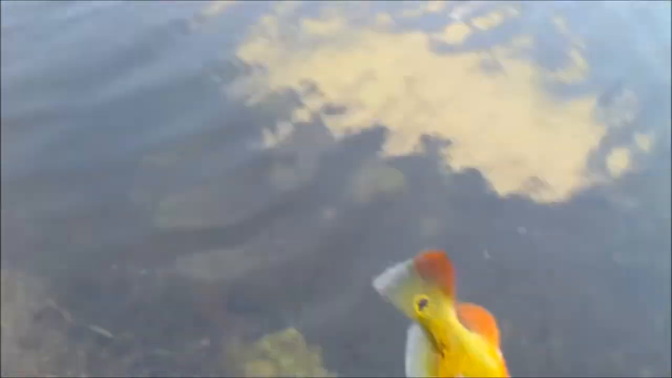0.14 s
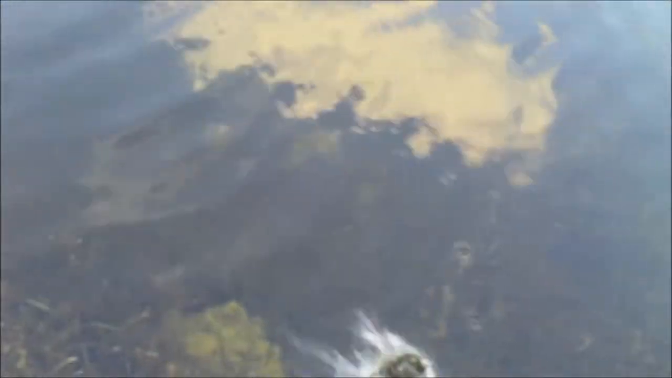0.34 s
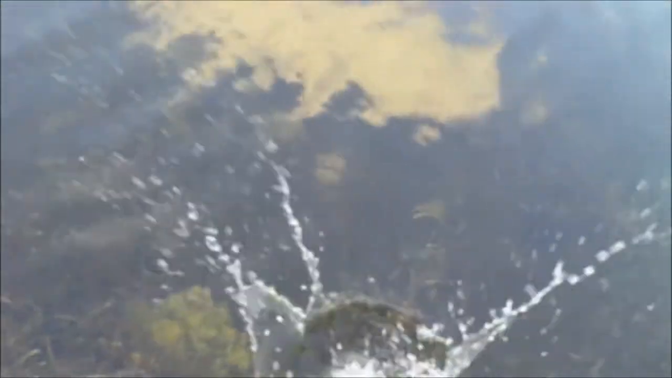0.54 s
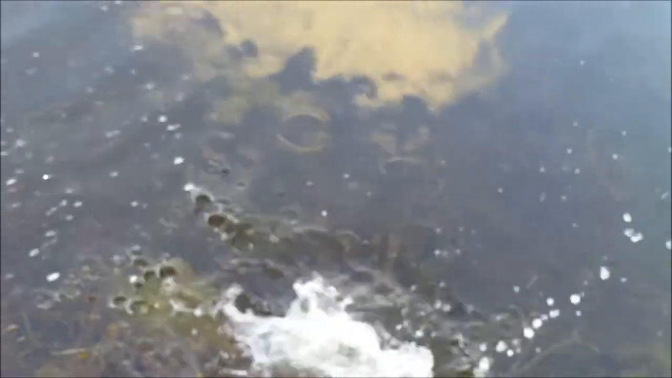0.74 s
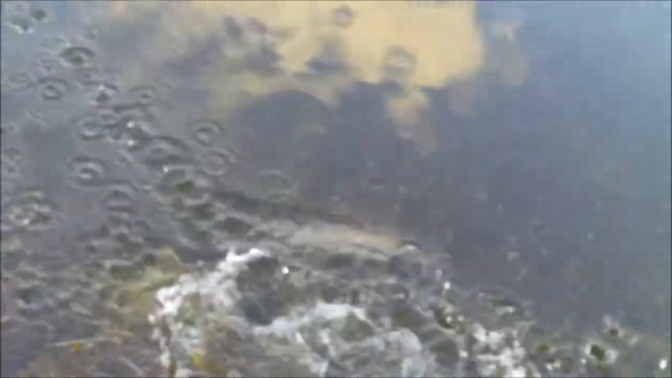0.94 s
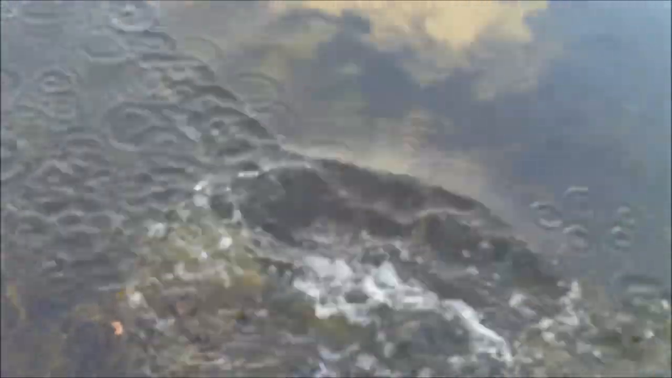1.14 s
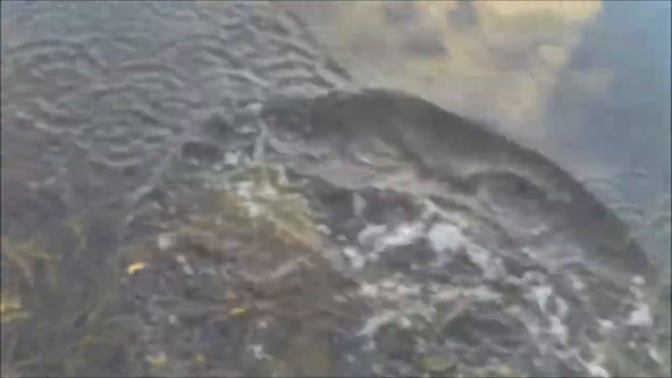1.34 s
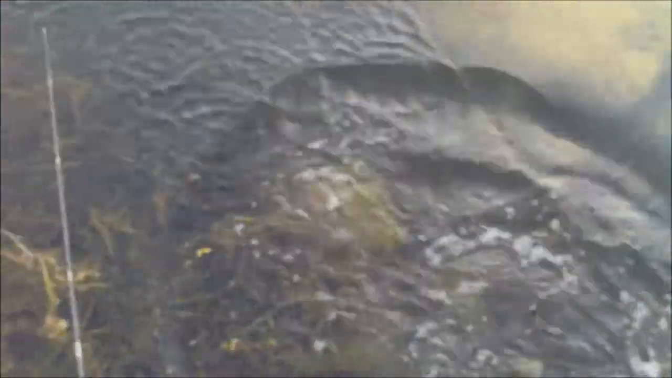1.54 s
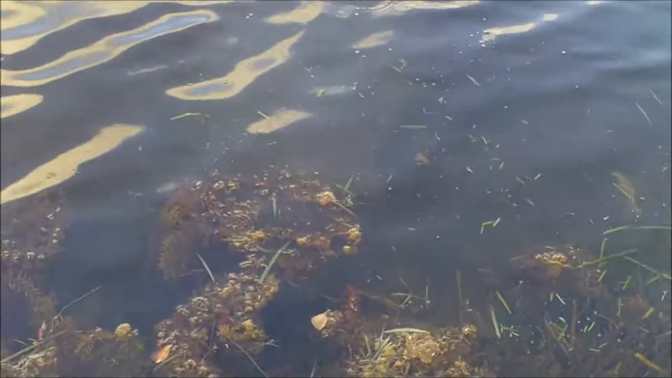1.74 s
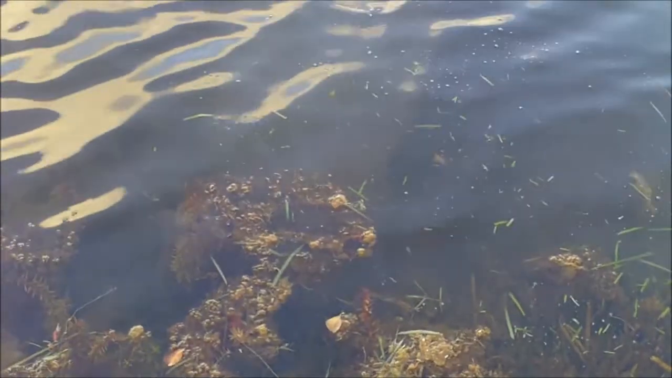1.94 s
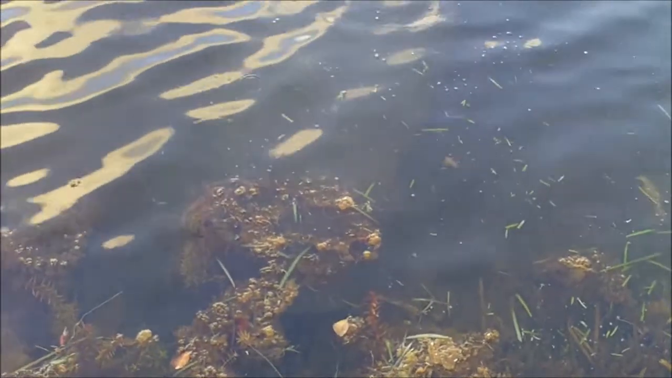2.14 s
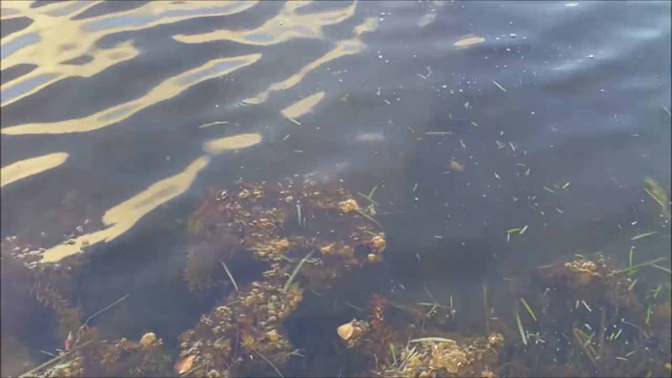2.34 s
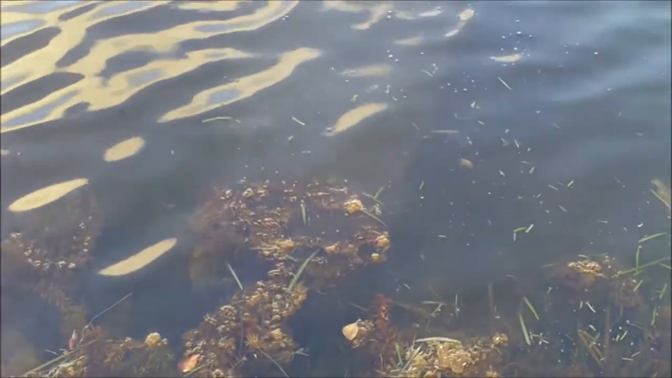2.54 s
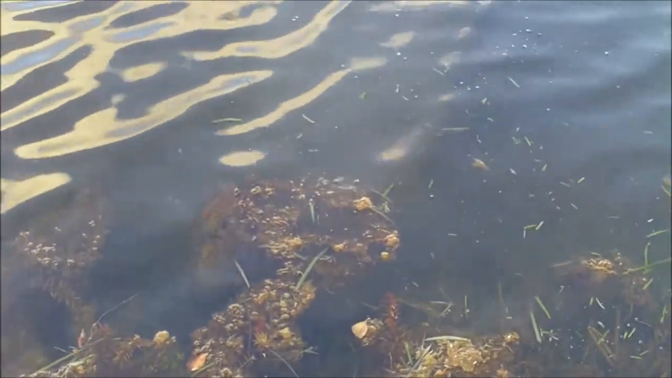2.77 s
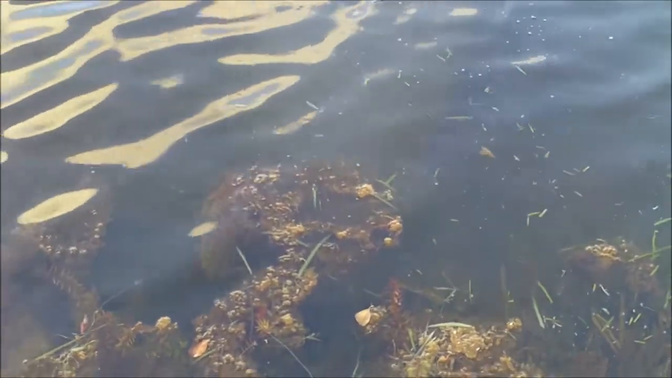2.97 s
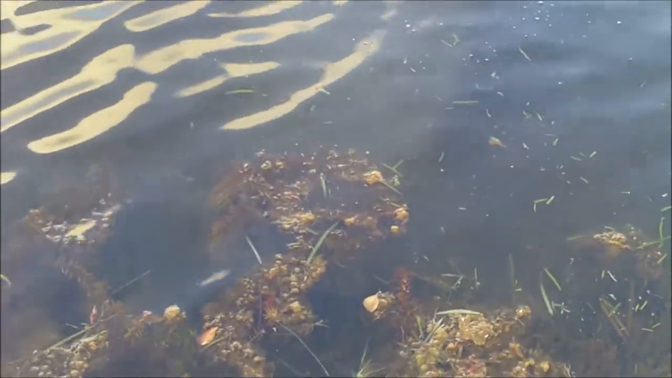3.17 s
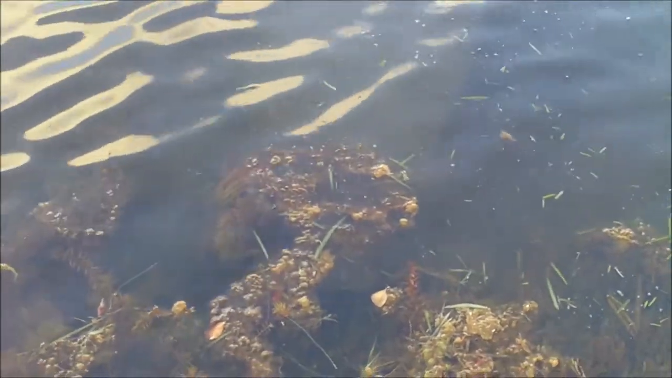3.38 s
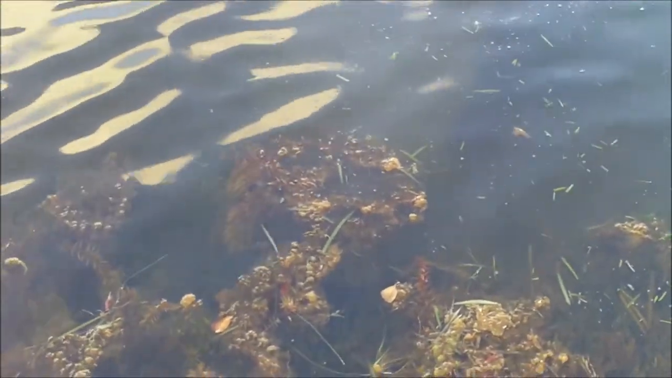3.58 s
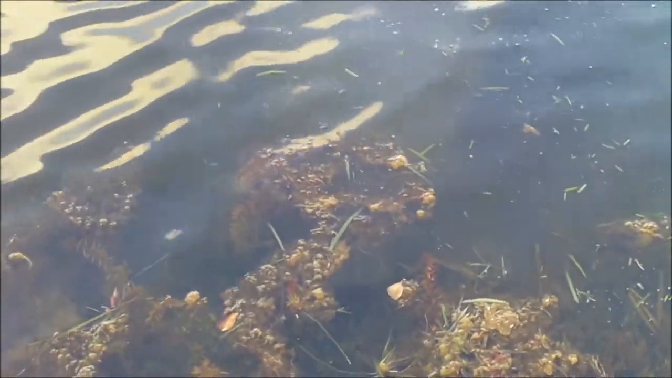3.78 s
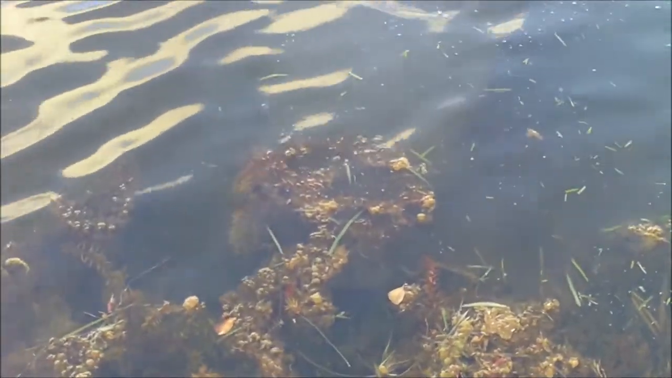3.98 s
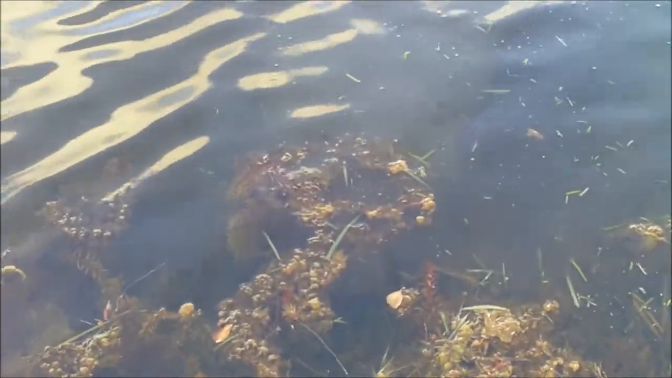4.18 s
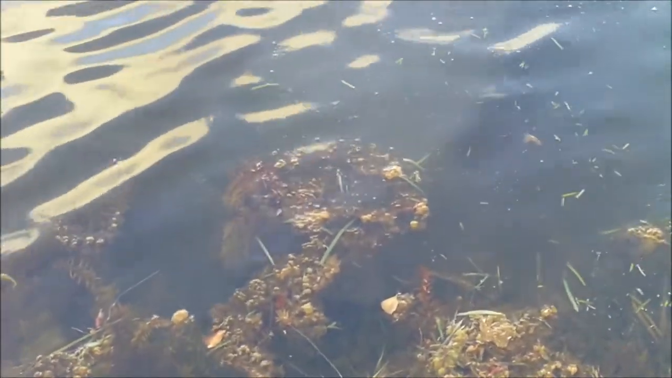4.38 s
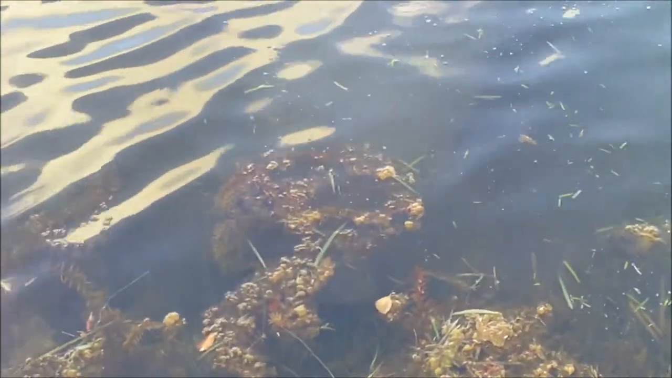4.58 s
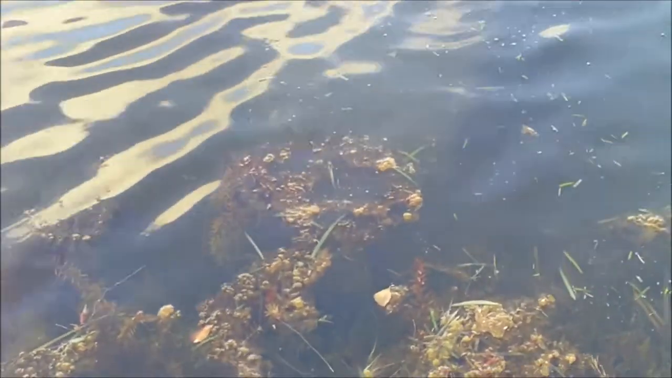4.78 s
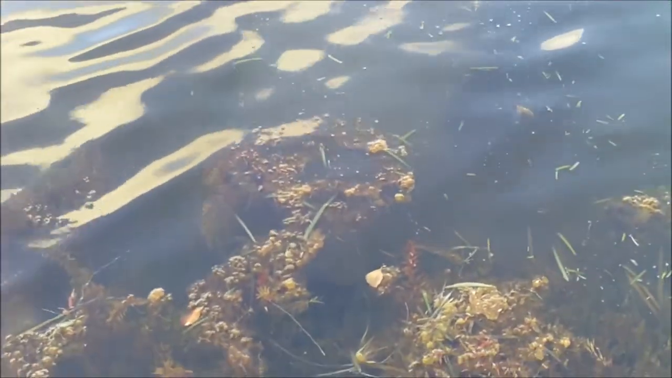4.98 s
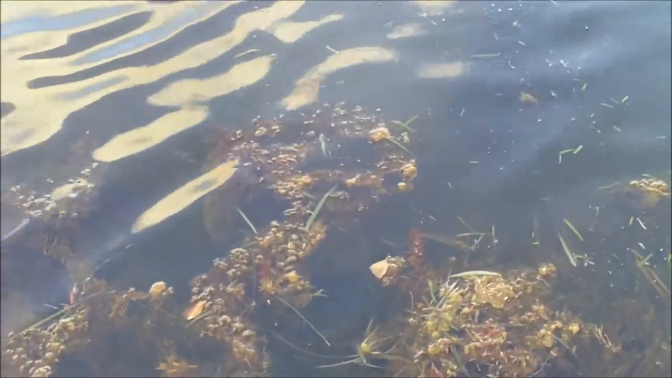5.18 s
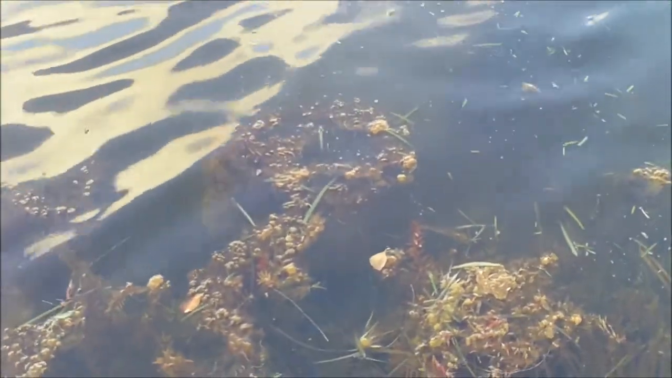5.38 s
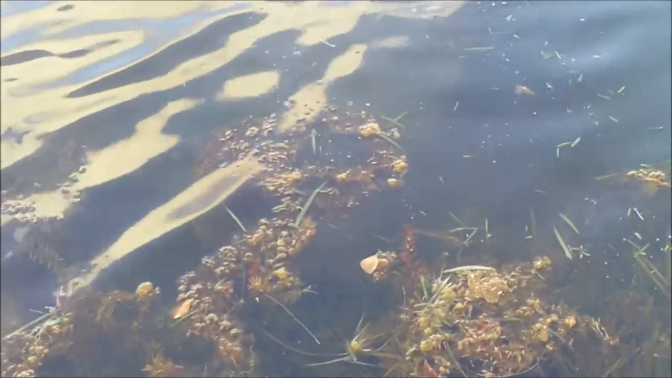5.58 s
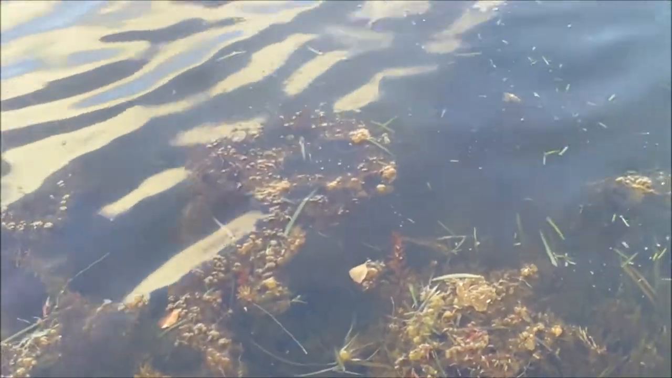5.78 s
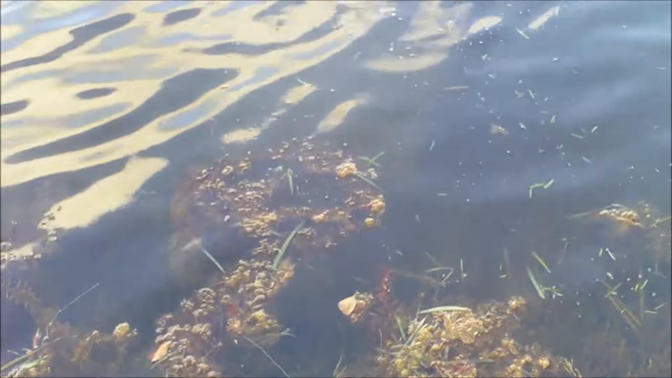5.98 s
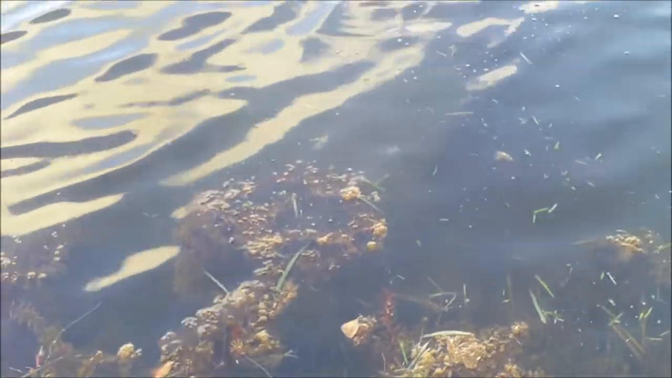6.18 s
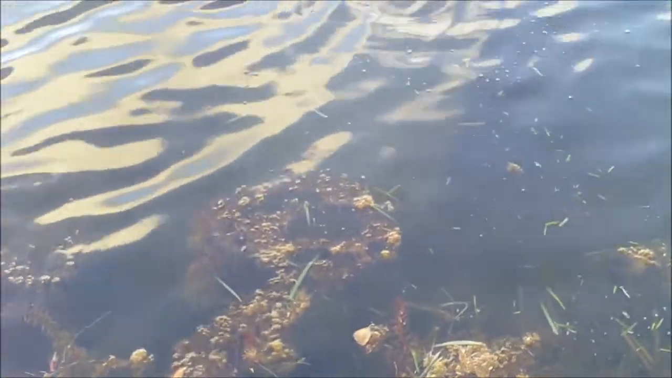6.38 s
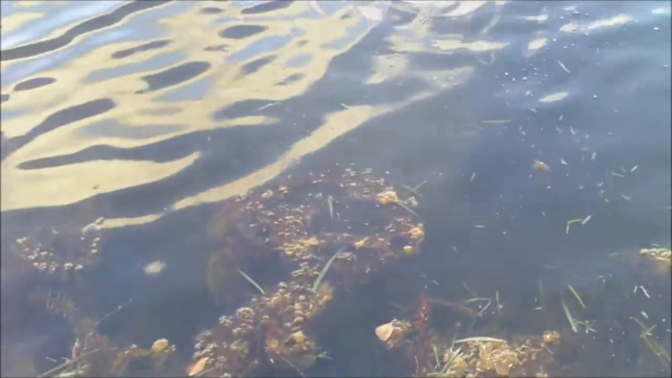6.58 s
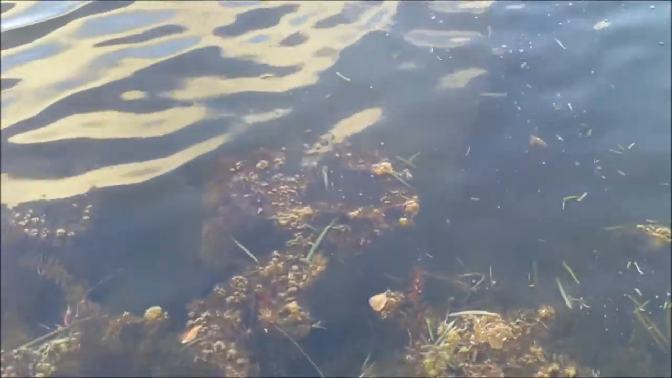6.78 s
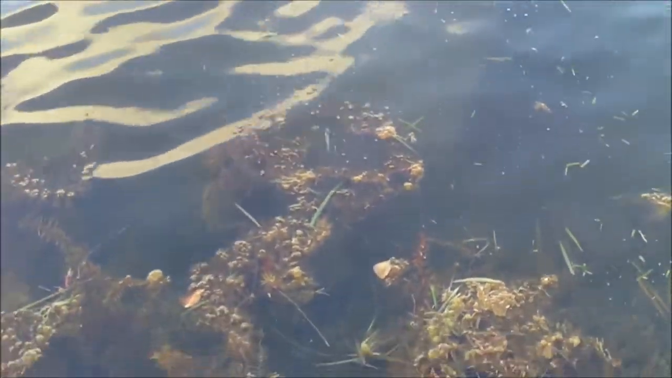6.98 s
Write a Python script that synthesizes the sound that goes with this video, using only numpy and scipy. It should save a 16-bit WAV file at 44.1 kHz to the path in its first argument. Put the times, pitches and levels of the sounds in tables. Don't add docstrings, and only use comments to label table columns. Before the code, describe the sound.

Outdoors at a lake edge, a fish dropped into the water hits with a hard, close slap. A hollow gulp, large bubbles and falling spray follow and fade within a second. After an instant of near silence, light knocks and ticks of a fishing reel lead to two very loud metallic snaps, the second springier, then a few more clicks. Far traffic and soft hiss continue throughout.

```python
import sys
import numpy as np
from scipy import signal
from scipy.fft import rfft, irfft, next_fast_len
from scipy.io import wavfile
from scipy.ndimage import uniform_filter1d, map_coordinates

SR = 44100
rng = np.random.default_rng(int(sys.argv[2]) if len(sys.argv) > 2 else 0)


def invert_db(level):
    return 10 ** (np.asarray(level, dtype=float) / 20)


def transcribe(u):
    v = np.clip(np.atleast_2d(u).T, -1, 1)
    q = np.round(v * 32767).astype(np.int16)
    wavfile.write(sys.argv[1], SR, q)


N = 309582

# time in seconds, level in dB.
TRAFFIC = [(0.0, -36.5), (0.31, -37.5), (1.02, -43.5), (1.146, -40), (1.65, -38.5), (1.85, -40.5),
           (2.21, -39), (2.67, -42), (2.92, -39), (3.78, -39.5), (4.02, -40), (4.31, -41), (4.62, -39),
           (5.08, -39.5), (5.73, -40), (6.08, -39.5), (6.43, -38), (7.02, -38.5)]
# frequency in Hz, level in dB per Hz.
ROAR_LAKE = [(210, -52.5), (350, -22.5), (498, -6), (582, -16.5), (694, -6), (1070, -1), (1380, -4),
             (1550, -9.5), (2050, -6), (3200, -19.5), (4160, -64.5), (7040, -120)]
# frequency in Hz, level in dB per Hz.
ROAR_TURNING = [(210, -50), (350, -12.5), (694, -8), (1090, -1), (1430, -3), (1530, -10.5), (1840, -2),
                (2130, 1.5), (2450, -14.5), (3200, -13.5), (4160, -43), (7040, -120)]
# frequency in Hz, level in dB per Hz.
ROAR_REEL = [(210, -61.5), (350, -25), (531, -8), (621, -7.5), (875, -3.5), (951, -3.5), (1180, 1.5),
             (1420, 1), (1580, -2.5), (1750, -9.5), (2130, -0.5), (3200, -21.5), (4160, -61), (7040, -120)]
# time in seconds, place (0 first, 1 turning, 2 second).
ROAR_TURN = [
    (1.0, 0),
    (1.3, 1),
    (1.5, 1),
    (1.7, 2),
]
# frequency in Hz, level in dB per Hz.
RUMBLE = [(12, -41.5), (25, -20), (70, -1), (325, -1), (387, -2.5), (500, -2), (650, -4), (1100, -120)]
# centre in seconds, height in dB, half length in seconds.
SWELLS = [
    (.8, -4.5, 0.45),
    (1.755, 7, 0.099),
    (4.1, -1, 0.168),
    (5.4, 1.5, 0.47),
]
# centre in seconds, level in dB, half length in seconds.
PASSING = (4.02, -44, 0.716)
# frequency in Hz, level in dB per Hz.
TYRES = [(1200, -38.5), (1800, 3.5), (2150, 5.5), (2500, -11), (3300, -5), (4500, -28)]
# frequency in Hz, level in dB per Hz.
HISS = [(1530, -16.5), (2600, -6), (2800, -11.5), (3080, -2.5), (3910, -8.5), (4570, -5.5), (5180, -8),
        (5750, -6.5), (6280, -7), (7340, -7), (7970, -9.5), (10200, -17), (12100, -32), (14400, -16),
        (15300, -18)]
# time in seconds, centre in Hz, level in dB.
BAND = [(1.1, 7300, -72), (1.3, 8070, -58.5), (1.65, 8160, -57.5), (1.7, 6780, -61), (3.4, 6570, -55.5),
        (4.7, 6990, -53), (5.2, 7445, -58.5), (5.8, 7074, -60.5)]
# frequency in Hz, level in dB per Hz.
BREEZE = [(12, -19), (22, -8.5), (45, 0), (90, -38.5)]
# start in seconds, end in seconds, pitch in Hz, level in dB.
HUMS = [
    (0, 0.34, 177.7, -53.5),
    (.9, 1.66, 186, -62.5),
    (1.848, 2.6, 69.3, -69),
    (2.299, 2.643, 593, -50.5),
]
# start in seconds, peak in dB, top in Hz, 60 dB decay in seconds.
RUBS = [
    (1.655, -34, 1490, 0.069),
    (1.671, -27.5, 1190, 0.045),
    (1.8035, -20.5, 3000, 0.0181),
    (1.941, -23.5, 3500, 0.0135),
    (1.9412, -30, 15000, 0.0112),
    (1.949, -27.5, 6000, 0.0104),
    (2.116, -37.5, 9000, 0.079),
    (3.5102, -23.5, 15000, 0.016),
    (3.7282, -29, 15000, 0.014),
]
# start in seconds, peak in dB, pitch in Hz.
TICKS = [(1.885, -35.5, 7960), (1.8873, -23.5, 7210), (2.1114, -38.5, 6030), (2.132, -23.5, 7570),
         (2.1346, -28.5, 6200), (2.2655, -36, 7700), (3.5009, -28.5, 6740), (3.5104, -25.5, 6720),
         (3.5223, -22, 6800), (3.6835, -28, 7350), (3.707, -27.5, 6600), (3.7207, -29, 6900),
         (3.7287, -29, 7400), (6.869, -29.5, 7010)]
# centre in seconds, level in dB, pitch in Hz, half length in seconds.
KNOCK = (1.1501, -15.5, 1000, .0005)
# start in seconds, rattle in dB, rattle length in seconds, spring in dB.
SNAPS = [
    (2.6732, 6, 0.00215, 1),
    (3.2586, 7, .0026, 6.5),
]
# pitch in Hz, level in dB, 60 dB decay in seconds.
BODIES = [
    [(641, -18.5, 0.051), (880, -7, 0.0235), (1396, -4, 0.0159), (2394, -16.5, 0.0213), (7460, -17, 0.0172),
     (248.5, -42, 0.17)],
    [(583.8, -17, 0.0457), (901, -23, 0.072), (1368, -8.5, 0.0275), (2093, -9.5, 0.0134),
     (6720, -22, 0.033), (249.5, -43.5, 0.338)],
]
# pitch in Hz, level in dB, 60 dB decay in seconds.
SPRING = [
    (3160, -25, 0.137),
    (4230, -46, 0.15),
    (5055, -45, 0.105),
    (6300, -46.5, .15),
]
# start in seconds, peak in dB, top in Hz, 60 dB decay in seconds.
SLAP = [(.3293, 1, 16200, 0.0096)]
# start in seconds, length in seconds, pitch in Hz, level in dB.
CAVITY = (.4358, .029, 336, -11)
# start in seconds, peak in dB, pitch in Hz.
BUBBLES = [(.334, -18, 657), (0.333, -20.5, 1746), (.335, -27, 350.5), (.358, -38, 710), (.404, -25, 376),
           (.409, -15.5, 1540), (0.417, -22.5, 880), (.44, -14.5, 879), (.459, -13, 926), (.47, -17, 549),
           (0.486, -18, 1313), (0.499, -30, 267), (.508, -20, 902), (.522, -35.5, 983), (.575, -25.5, 547),
           (.585, -33, 400.3), (.636, -30, 975), (.648, -34.5, 983), (0.673, -21, 1886), (0.675, -21, 1616),
           (0.7233, -24, 1543), (.733, -29.5, 867.5), (.764, -28.5, 562), (.77, -28, 1470),
           (.811, -25, 1266), (.82, -30, 888), (.823, -24, 1486), (.855, -26.5, 1508), (.922, -29.5, 1125),
           (.945, -35.5, 410)]
# start in seconds, peak in dB, pitch in Hz.
DRIPS = [
    (1.53, -32, 761),
    (1.575, -38.5, 724),
    (1.66, -29, 728),
    (1.806, -28, 918),
    (1.806, -23.5, 1496),
    (2.938, -25.5, 2147),
]
# start in seconds, peak in dB, top in Hz.
SHEETS = [(0.33, -9.5, 3550), (.403, -19, 3500), (.455, -20.5, 4460), (.488, -27, 6500),
          (.506, -23.5, 6500), (0.52, -21, 4000), (.54, -24.5, 7000), (.659, -38.5, 2400),
          (0.674, -28, 2400), (.701, -29, 5000), (0.7231, -28, 2400), (.766, -24.5, 4000), (.85, -32, 6500),
          (.866, -29, 4000), (.926, -33.5, 3000)]
# peak in seconds, bubbling in dB, spray under it in dB, swell in seconds,
# fade in seconds, both over 20 dB.
SURGES = [
    (.334, -15, -5, 0.0026, 0.0266),
    (.362, -27.5, -10.5, 0.0204, 0.055),
    (.44, -18, -15.5, 0.065, 0.093),
    (.527, -27, -7, 0.112, 0.0453),
    (.584, -38.5, -8, 0.024, 0.075),
    (.925, -34, -11, 0.057, 0.108),
    (.972, -42, -11.5, 0.034, 0.18),
]
# start in seconds, end in seconds, bubbling in dB, spray under it at the end in dB.
RAIN = (.642, .89, -37.5, -6)
# frequency in Hz, level in dB per Hz.
BUBBLING = [(88, -65), (150, -22), (341, -20), (464, -12.5), (872, -8.5), (2440, -16), (2910, -39.5),
            (3220, -28.5), (3950, -42.5), (5000, -30.5), (6500, -60.5), (11000, -120)]
# frequency in Hz, level in dB per Hz.
SPRAY = [(1470, -45.5), (2500, -2), (2890, -3.5), (3520, -4), (3980, -22), (5320, -14), (9220, -19),
         (11000, -28), (11700, -70), (13100, -28), (15500, -16)]
# above this frequency in Hz, under this share of the local power.
FAINT = (9300, .95)
# centre in Hz, width in Hz, depth from 0 to 1.
DIP = (11900, 2600, .97)
# centre in Hz, width in Hz, depth from 0 to 1.
NOTCH = (3950, 60, .85)
# from Hz, to Hz.
DEAF = (11750, 12350)
# start in seconds, end in seconds, depth in dB at the start, at the end.
HUSH = (1.6765, 1.7085, -29, -50)

RUMBLE_DB, HISS_DB = -13.5, -9.5
RUMBLE_FOLLOWS, HISS_FOLLOWS = 0.65, 1
BREEZE_DB, BREEZE_GROWS_DB_PER_S = -82.5, 2
RATTLE_TOP_HZ, TOP_HZ = 14260, 15300
BUBBLE_T60_S, BUBBLE_REF_HZ = 0.0366, 1010
SMALL_DIE_SOONER = 0.656
SHEET_T60_S = 0.0254
SPRAY_SWINGS = 0.993
RAIN_GROWS_DB_PER_S, RAIN_SPRAY_GROWS_DB_PER_S, RAIN_EDGE_S = 12.5, 17.5, 0.023
HUSH_EDGE_S, RETURN_DB, RETURN_S = .002, -4.5, 0.123


def unit(x):
    return x / np.sqrt(np.mean(x ** 2) + 1e-20)


def curves(rows):
    s, *cols = np.transpose(rows)
    return [np.interp(np.arange(N) / SR, s, c) for c in cols]


def wobble(rate):
    knots = rng.standard_normal(int(N * rate / SR) + 4)
    return map_coordinates(knots, [np.arange(N) * rate / SR])


def bell(s, half):
    return np.exp(-((np.arange(N) / SR - s) / half) ** 2)


def filtered(x, response):
    m = next_fast_len(N + 8192)
    return irfft(rfft(x, m) * response(np.fft.rfftfreq(m, 1 / SR)), m)[:N]


def coloured(x, spectrum):
    f, db = np.transpose(spectrum)
    return unit(filtered(x, lambda hz: invert_db(np.interp(np.log(hz + 1), np.log(f + 1), db))))


def notched(x, notch):
    hz0, width, depth = notch
    return filtered(x, lambda hz: 1 - depth / (1 + 1j * (hz - hz0) / width))


def thinned(x):
    hz, _, z = signal.stft(x, SR, nperseg=2048)
    low_hz, share = FAINT
    power = uniform_filter1d(np.abs(z) ** 2, size=4, axis=0)
    around = uniform_filter1d(uniform_filter1d(power, size=40, axis=0), size=9, axis=1)
    faint = (power < share * around) & (hz[:, None] > low_hz)
    return signal.istft(np.where(faint, 0, z), SR, nperseg=2048)[1][:N]


def patchy(patchy_db):
    z = signal.stft(rng.standard_normal(N), nperseg=512)[2]
    field = uniform_filter1d(rng.standard_normal(z.shape), 5, 0)
    field = uniform_filter1d(field, 10, 1)
    return signal.istft(z * invert_db(patchy_db * unit(field)), nperseg=512)[1][:N]


def add(track, s, sound):
    part = track[round(s * SR):][:len(sound)]
    part += sound[:len(part)]


def ring(hz, db, t60, rise=0., attack=0.000338, rough=0.):
    t = np.arange(int(t60 * SR)) / SR
    waver = rough * np.interp(t * hz / 2, np.arange(64), rng.standard_normal(64))
    phase = 2 * np.pi * hz * t * (1 + rise * t / t60) + waver
    return invert_db(db - 60 * t / t60) * (1 - np.exp(-t / attack)) * np.sin(phase)


def puffs(rows):
    out, t = np.zeros(N), np.arange(SR // 10) / SR
    for s, db, top_hz, t60 in rows:
        band = signal.butter(3, [450, min(top_hz, .45 * SR)], "band", fs=SR)
        noise = unit(signal.lfilter(*band, rng.standard_normal(len(t))))
        attack = np.clip(t / (0.0363 * t60), 0, 1)
        add(out, s, invert_db(db - 4.0 - 60 * t / t60) * attack * noise)
    return out


def air():
    roar_db, = curves(TRAFFIC)
    mean_db = roar_db.mean()
    swing_db = roar_db - mean_db
    turn, = curves(ROAR_TURN)
    roar = np.zeros(N)
    for place, colour in enumerate([ROAR_LAKE, ROAR_TURNING, ROAR_REEL]):
        share = np.clip(1 - abs(turn - place), 0, 1)
        roar += np.sqrt(share) * coloured(patchy(patchy_db=0.96), colour)
    gust = wobble(4.1)

    rumble_db = mean_db + RUMBLE_DB + RUMBLE_FOLLOWS * swing_db
    rumble_db += sum(db * bell(s, half) for s, db, half in SWELLS)
    rumble = invert_db(rumble_db + 0.88 * wobble(2.786)) * coloured(patchy(patchy_db=1.07), RUMBLE)

    hiss_db = mean_db + HISS_DB + HISS_FOLLOWS * swing_db + 0.184 * gust
    hiss = invert_db(hiss_db) * coloured(patchy(patchy_db=1.2055), HISS)
    band_hz, band_db = curves(BAND)
    hiss += invert_db(band_db) * wobble(600) * np.sin(2 * np.pi * np.cumsum(band_hz) / SR)

    breeze_db = BREEZE_DB + BREEZE_GROWS_DB_PER_S * np.arange(N) / SR
    breeze = invert_db(breeze_db) * coloured(rng.standard_normal(N), BREEZE)
    s, db, half = PASSING
    car = invert_db(db) * bell(s, half) * coloured(patchy(patchy_db=-0.87), TYRES)
    roar *= invert_db(roar_db + .55 * gust + .6 * wobble(14))
    return car + rumble + breeze + roar + hiss


def line():
    out = np.zeros(N)
    for start, end, hz, db in HUMS:
        n = round((end - start) * SR)
        phase = 2 * np.pi * np.cumsum(hz * (1 + 0.0069 * wobble(6.85)[:n])) / SR
        level = invert_db(db + 2.5 + 3.26 * wobble(25.23)[:n])
        add(out, start, level * signal.windows.tukey(n, .15) * np.sin(phase))
    return out


def ticks():
    out, t = np.zeros(N), np.arange(SR // 100) / SR
    port = signal.butter(2, [13500, 15600], "band", fs=SR)
    for s, db, hz in TICKS:
        band = signal.butter(1, [0.818 * hz, 1.194 * hz], "band", fs=SR)
        noise = rng.standard_normal(len(t))
        click = unit(signal.lfilter(*band, signal.lfilter(*band, noise)))
        puff = click + .6 * signal.lfilter(*port, noise)
        add(out, s, invert_db(db - 7 - 60 * t / 0.02) * np.clip(t / 0.00037, 0, 1) * puff)
    s, db, hz, width = KNOCK
    t = np.arange(-100, 100) / SR
    add(out, s + t[0], -invert_db(db) * np.exp(-(t / width) ** 2) * np.cos(2 * np.pi * hz * t))
    return out


def reel():
    out, t = np.zeros(N), np.arange(SR // 25) / SR
    dull = signal.butter(2, [600, RATTLE_TOP_HZ], "band", fs=SR)
    for (s, rattle_db, length, spring_db), body in zip(SNAPS, BODIES):
        shape = np.where(t < length, 1, 0.039 * np.exp((length - t) / 0.0019))
        rattle = unit(signal.lfilter(*dull, rng.standard_normal(len(t))))
        add(out, s + .0004, invert_db(rattle_db - 9.5) * shape * rattle)
        for hz, db, t60 in body:
            late = 0.002174 * rng.random() ** 2
            add(out, s + late, ring(hz, db + 4.0, t60, rough=0.773))
        for hz, db, t60 in SPRING:
            add(out, s + 0.001182, ring(hz, db + spring_db, t60))
    return signal.sosfilt(signal.butter(6, [170, RATTLE_TOP_HZ], "band", fs=SR, output="sos"), out)


def grains(count, low_hz, high_hz, cycles, scatter_db, first, last):
    when, pitch, size = rng.random((count, 3)).T
    hz = (low_hz * (high_hz / low_hz) ** pitch)[:, None]
    turns = np.arange(400) / SR * hz
    shape = np.sin(2 * np.pi * turns * (1 + 0.01754 * turns))
    shape = shape * np.exp(-turns / cycles) * (1 - np.exp(-turns))
    shape = shape * hz * invert_db(-scatter_db * np.log(1 - size))[:, None]
    start = ((first + when * (last - first)) * SR).astype(int)
    return np.bincount((start[:, None] + np.arange(400)).ravel(), shape.ravel(), N)


def stirring():
    t = np.arange(N) / SR
    shapes = []
    for s, db, under_db, swell, fade in SURGES:
        shapes.append((db, under_db, 20 * np.minimum((t - s) / swell, (s - t) / fade)))
    start, end, db, under_db = RAIN
    left = np.minimum(t - end, 0)
    edges_db = 20 * np.minimum(np.minimum(t - start, end - t), 0) / RAIN_EDGE_S
    rain_under_db = under_db + RAIN_SPRAY_GROWS_DB_PER_S * left
    shapes.append((db, rain_under_db, edges_db + RAIN_GROWS_DB_PER_S * left))
    bubbling = np.sqrt(sum(invert_db(db + shape_db) ** 2 for db, _, shape_db in shapes))
    spray = np.sqrt(sum(invert_db(db + under_db + SPRAY_SWINGS * shape_db) ** 2 for db, under_db, shape_db in shapes))
    return bubbling, spray


def cavity():
    out = np.zeros(N)
    s, length, hz, db = CAVITY
    hollow = ring(hz, db, .25, rise=.25, attack=.001, rough=.15)[:round(length * SR)]
    add(out, s, hollow * signal.windows.tukey(len(hollow), .45))
    return out


def bubbles():
    out = np.zeros(N)
    for s, db, hz in BUBBLES + DRIPS:
        t60 = BUBBLE_T60_S * (BUBBLE_REF_HZ / hz) ** SMALL_DIE_SOONER
        add(out, s, ring(hz, db + 4, t60, rise=.08, attack=.002, rough=.55))
    return out


def splash():
    first, last = .33, 1.06
    bubbling_gain, spray_gain = stirring()
    span = np.sqrt((last - first) * SR / N)
    small = grains(count=2000, low_hz=497.4, high_hz=5000, cycles=4.2, scatter_db=2.5, first=first, last=last)
    tiny = grains(count=4000, low_hz=3000, high_hz=14530, cycles=2.62, scatter_db=2.52, first=first, last=last)
    churn = invert_db(2.6 * wobble(60.21))
    bubbling = 0.81 * span * coloured(small, BUBBLING) + 0.767 * coloured(patchy(patchy_db=3.5), BUBBLING)
    spray = 0.666 * span * coloured(tiny, SPRAY) + 0.73 * coloured(patchy(patchy_db=0.5), SPRAY)
    water = invert_db(-2.5) * bubbling_gain * churn * bubbling
    water += invert_db(2.0) * spray_gain * churn * thinned(spray)
    return water + bubbles() + cavity()


def scene():
    slap = puffs(SLAP)
    sheets = puffs([(*row, SHEET_T60_S) for row in SHEETS])
    near = notched(sheets + puffs(RUBS) + ticks(), DIP)
    slot_hz = [DEAF[0] - 150, *DEAF, DEAF[1] + 150]
    far = filtered(thinned(air()) + splash() + near,
                   lambda hz: (hz < TOP_HZ) * np.interp(hz, slot_hz, [1, .1, .1, 1]))
    return (far + slap + reel() + line())[None]


def band_limit(x):
    return signal.sosfilt(signal.butter(12, 16430, fs=SR, output="sos"), x)


def record(dry):
    x = notched(dry[0], NOTCH)
    for _ in range(9):
        excess = np.clip(x, -1, 1) - x
        x = x + filtered(excess, lambda hz: np.clip(hz / 200 - .7, 0, 1) * np.clip(5.5 - hz / 3300, 0, 1))
    start, end, first_db, last_db = HUSH
    gap_db, = curves([(start, 0), (start + HUSH_EDGE_S, first_db), (end - HUSH_EDGE_S, last_db),
                      (end, RETURN_DB), (end + RETURN_S, 0)])
    mix = np.clip(x * invert_db(gap_db), -1, 1)
    return band_limit(mix[None])


dry = scene()
out = record(dry)
transcribe(out)
```